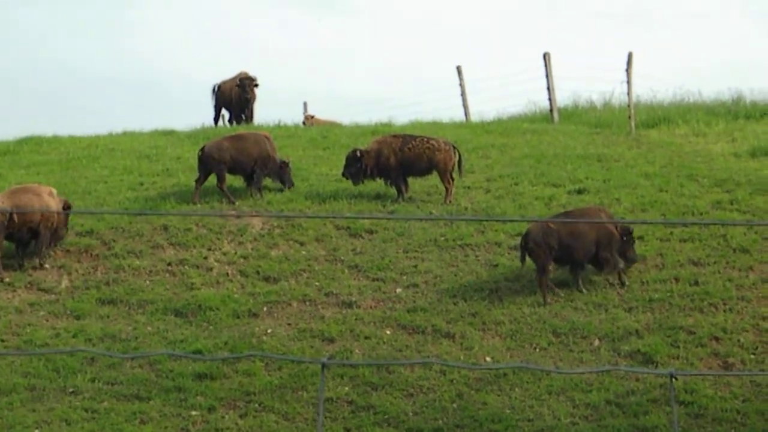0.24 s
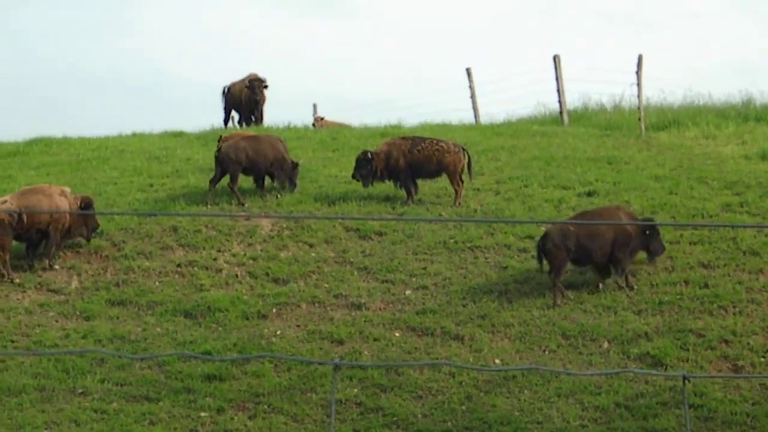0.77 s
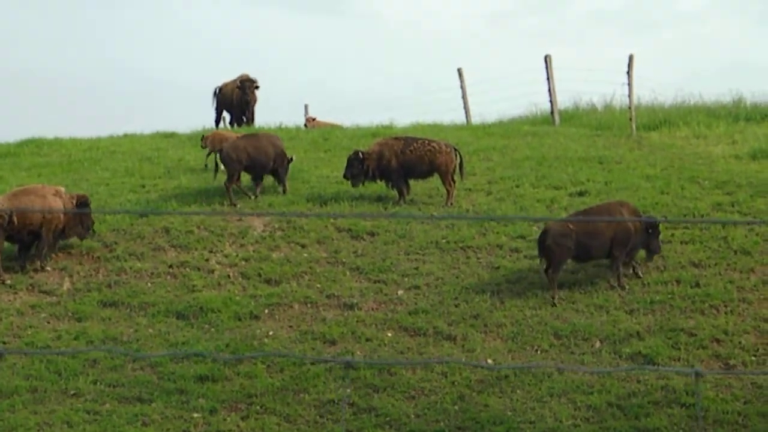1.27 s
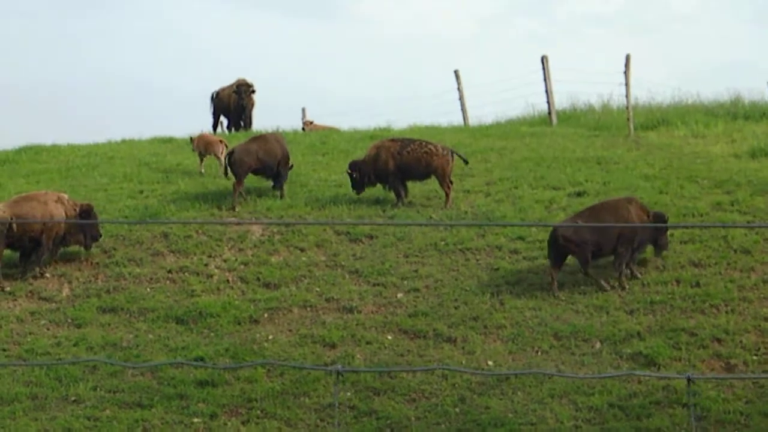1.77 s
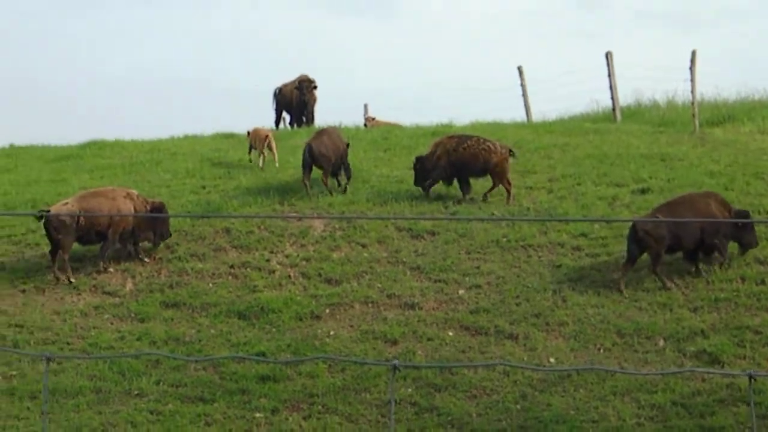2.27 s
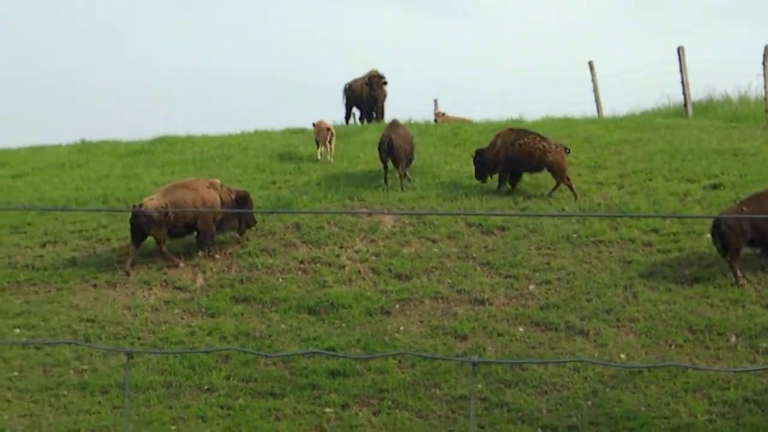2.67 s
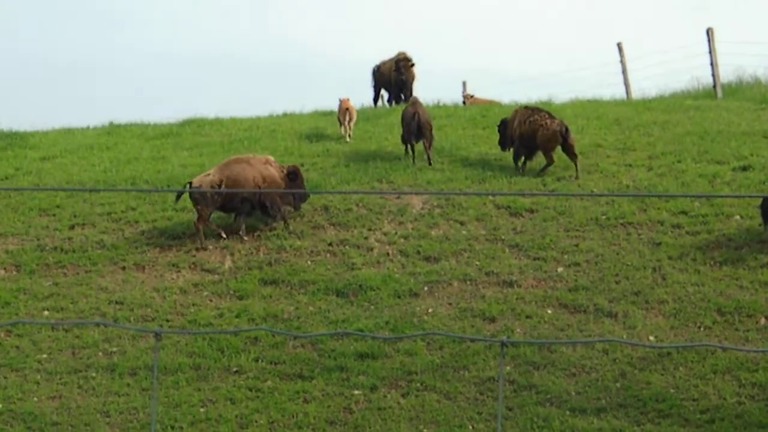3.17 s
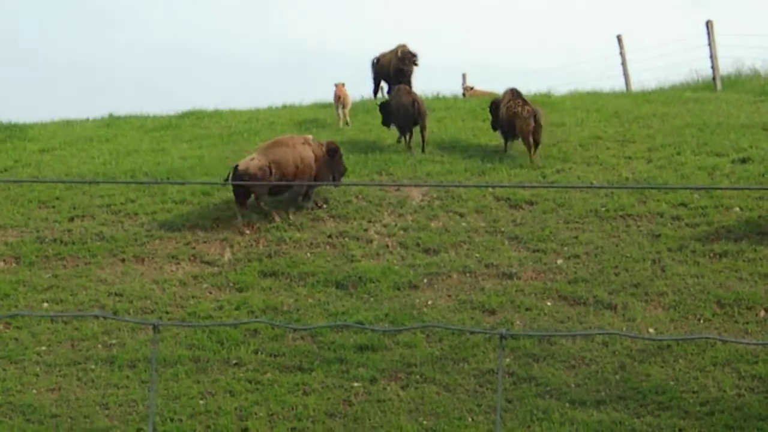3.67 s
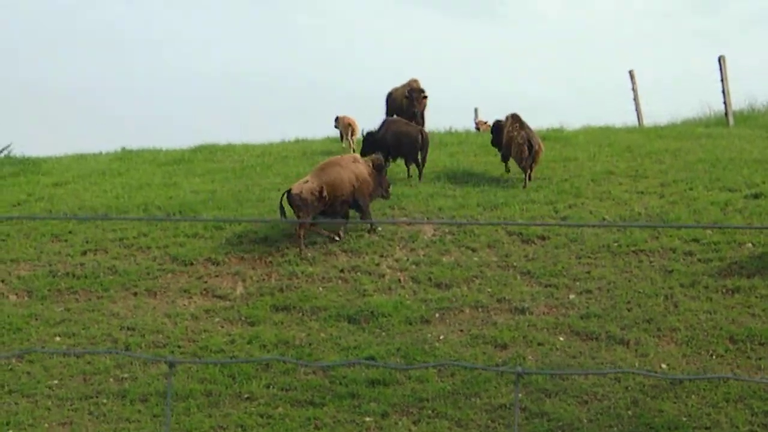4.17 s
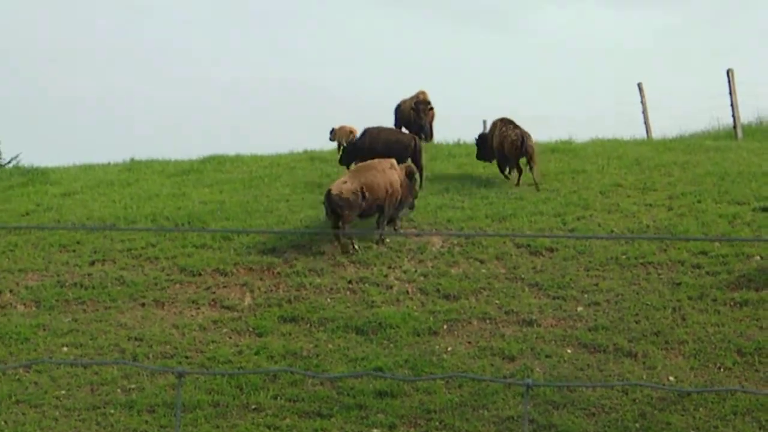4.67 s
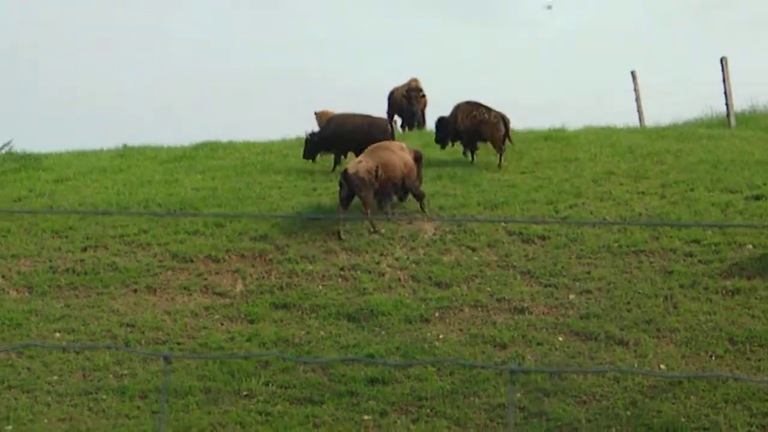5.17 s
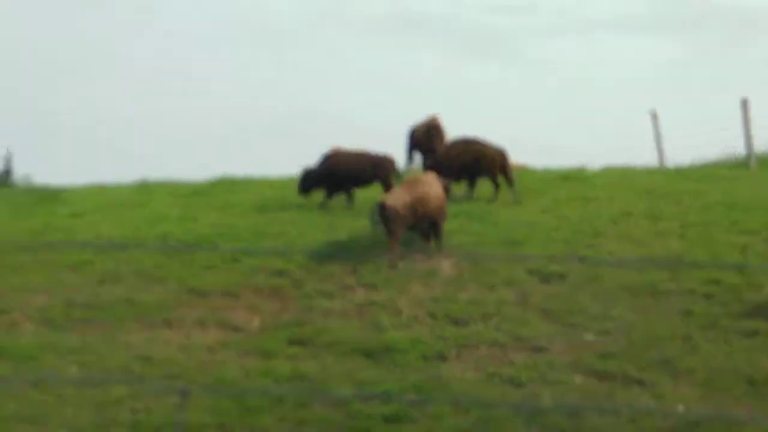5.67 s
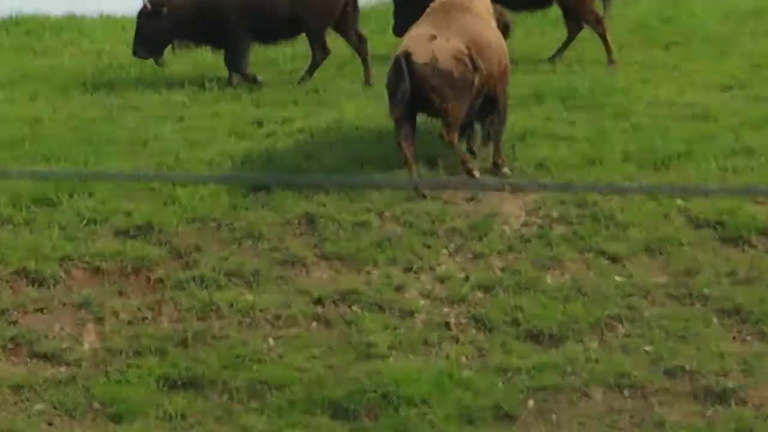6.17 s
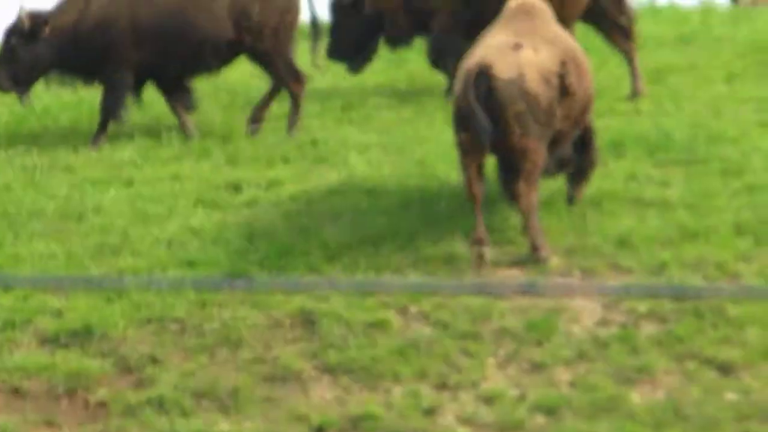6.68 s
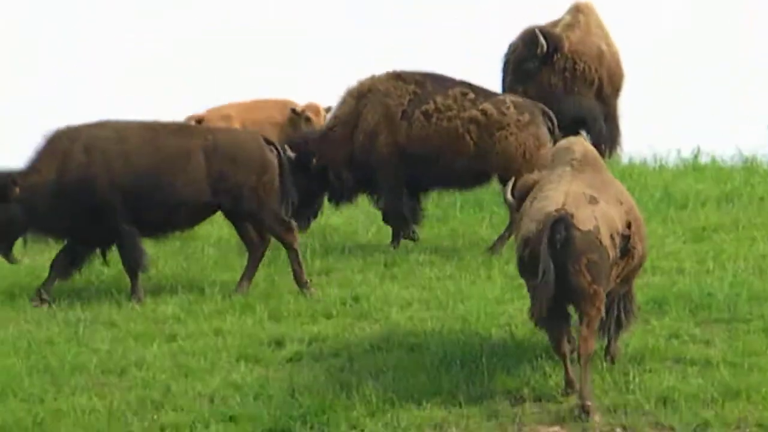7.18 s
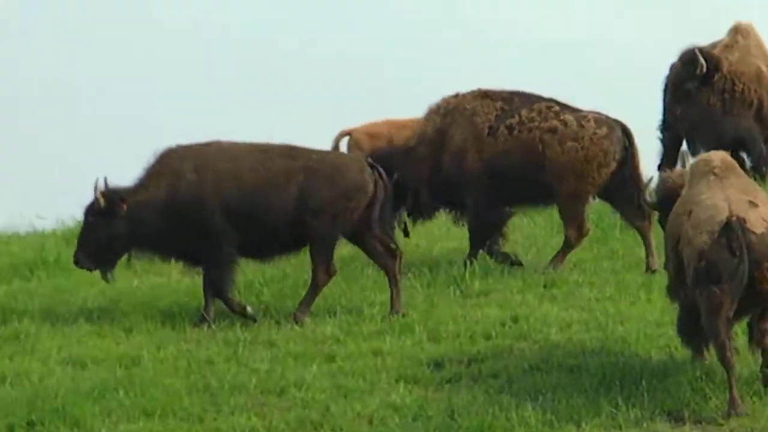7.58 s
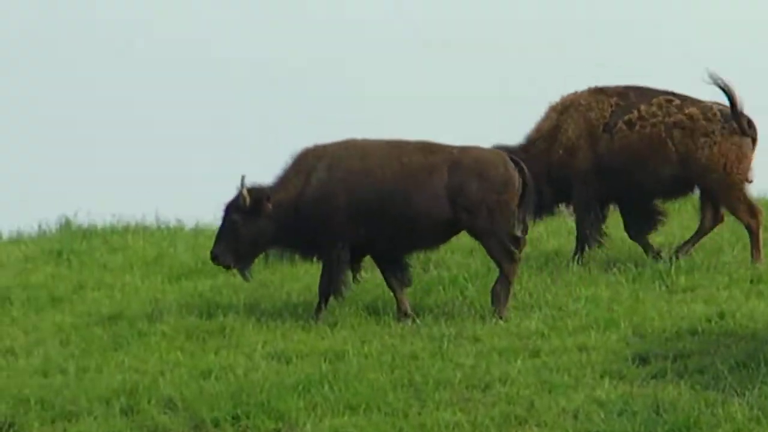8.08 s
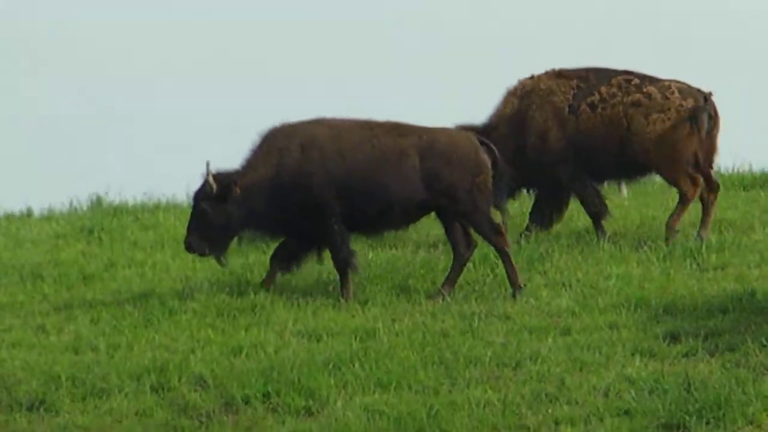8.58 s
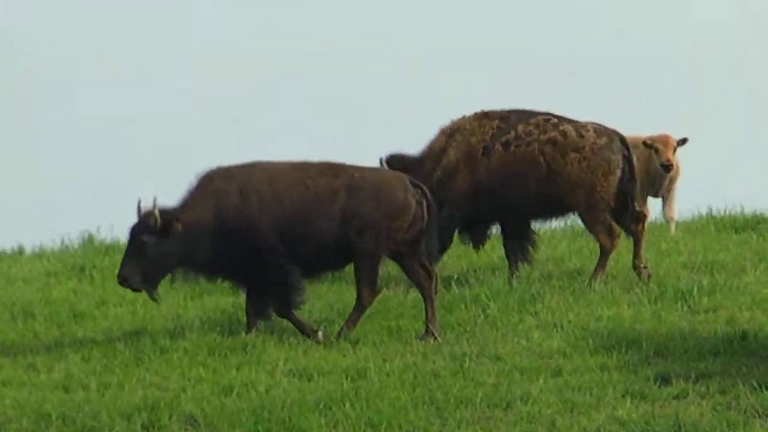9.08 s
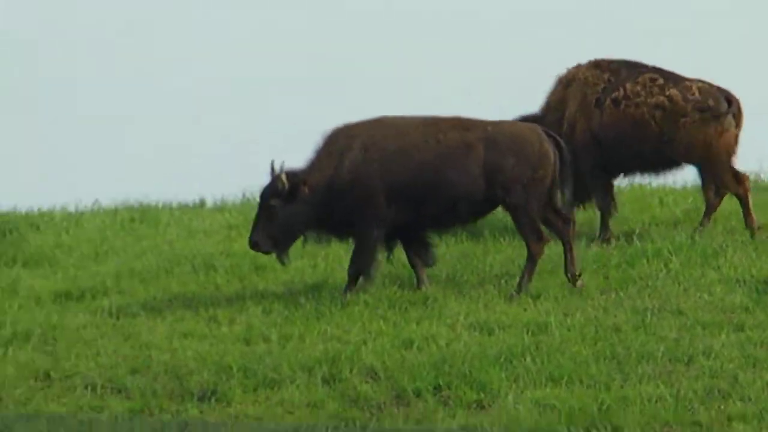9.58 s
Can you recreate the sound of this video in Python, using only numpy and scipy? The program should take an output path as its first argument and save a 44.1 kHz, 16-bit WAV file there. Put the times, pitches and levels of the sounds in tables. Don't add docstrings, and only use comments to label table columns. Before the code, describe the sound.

Bison give three low, rattling grunts on a grassy hillside amid crickets, bird trills and doves, while the handheld camera hums, knocks and clicks.

```python
import sys
import numpy as np
from scipy import signal
from scipy.io import wavfile

SR = 44100
rng = np.random.default_rng(int(sys.argv[2]) if len(sys.argv) > 2 else 0)


def generate_wav(signal):
    frames = np.transpose(np.atleast_2d(signal))
    scaled = np.clip(frames, -1, 1) * 32767
    pcm = np.round(scaled).astype(np.int16)
    wavfile.write(sys.argv[1], SR, pcm)


def linear_from_db(decibels):
    return 10 ** (np.asarray(decibels, float) / 20)


N = 433944


def rms_one(x):
    return x / np.sqrt(np.mean(x ** 2) + 1e-20)


def span(rows):
    s, *columns = np.transpose(rows)
    at = np.arange(round(s[0] * SR), min(N, round(s[-1] * SR) + 1))
    return at, [np.interp(at / SR, s, c) for c in columns]


def stretch(start, length):
    at = np.arange(round(start * SR), min(N, round((start + length) * SR)))
    return at, np.clip((at / SR - start) / length, 0, 1)


def faded(count, seconds):
    k = np.arange(count)
    return np.clip(np.minimum(k, count - k) / (seconds * SR), 0, 1)


def drift(rate_hz, size=N):
    r = np.exp(-2 * np.pi * rate_hz / SR)
    noise = rng.standard_normal(size + 9000)
    return rms_one(signal.lfilter([1], [1, -2 * r, r * r], noise)[9000:])


def band(x, low_hz, high_hz):
    return signal.sosfilt(signal.butter(2, [low_hz, high_hz], "band", fs=SR, output="sos"), x)


def ring(clicks, hz, t60):
    r, w = linear_from_db(-60 / (t60 * SR)), 2 * np.pi * hz / SR
    return signal.lfilter([0, np.sin(w)], [1, -2 * r * np.cos(w), r * r], clicks + 1e-18)


def add(out, start, hz, level):
    at = round(start * SR) + np.arange(len(hz))
    keep = at < N
    tone = level * np.sin(2 * np.pi * np.cumsum(hz) / SR)
    np.add.at(out, at[keep], tone[keep])


def hillside(x, echo_db, t60=0.32):
    t = np.arange(SR) / SR
    tail = rng.standard_normal(len(t)) * linear_from_db(-60 * t / t60) * (t > .008)
    return x + linear_from_db(echo_db) * signal.fftconvolve(x, tail / np.sqrt(np.sum(tail ** 2)))[:N]


# pitch_hz, level_db (per Hz)
HISS_COLOUR = [(25, -4.5), (50, -1.5), (77, 6), (150, -3), (300, -10.5), (500, -13.5), (1500, -15.5),
               (2500, -17.5), (4000, -17.5), (5600, -16), (7000, -9.5), (9000, -39)]
# middle_s, level_db, half_length_s
GUSTS = [
    (1.65, -58, 0.37),
    (2.704, -55, .25),
    (4.746, -40.5, 0.27),
    (6.189, -50, 0.57),
    (8.408, -54.5, .35),
    (9.5, -67, .6),
]


def air():
    hiss = np.zeros(N)
    edges_hz = 18 * 2 ** np.arange(0, 9.6, .5)
    white = rng.standard_normal((2, N))
    hz, db = np.transpose(HISS_COLOUR)
    for k, (low, high) in enumerate(zip(edges_hz, edges_hz[1:])):
        level_db = np.interp(np.log(low * high) / 2, np.log(hz), db)
        hiss += linear_from_db(level_db + .9 * drift(8)) * band(white[k % 2], low, high)
    t = np.arange(N) / SR
    wind = linear_from_db(-59.5)
    for s, db, half in GUSTS:
        wind = wind + linear_from_db(db) * np.exp(-2 * ((t - s) / half) ** 2)
    rumble = rms_one(band(rng.standard_normal(N), 31, 70))
    return linear_from_db(-49.5) * rms_one(hiss) + wind * linear_from_db(2 * drift(7.6)) * rumble


# time_s, level_db
CHORUS = [(0, -46.5), (1, -48.5), (8, -49), (8.6, -52), (9.84, -52.5)]


def far_crickets():
    far = np.zeros(N)
    u = np.arange(round(0.019 * SR)) / (0.02344 * SR)
    for hz, start, per_s in zip(np.linspace(4330, 4720, 9), rng.random(9), rng.uniform(3, 5, 9)):
        for s in np.arange(start / per_s, N / SR, 1 / per_s):
            loud = linear_from_db(4.5 * rng.standard_normal())
            for k in range(3):
                add(far, s + .033 * k, hz * (1.03 - 0.0697 * u), loud * np.sin(np.pi * u))
    blur = band(band(rng.standard_normal(N), 4567, 4940), 3986, 4300)
    skirt = band(rng.standard_normal(N), 4080, 4700)
    chorus = rms_one(rms_one(far) + 0.5 * rms_one(blur) + 0.49 * rms_one(skirt))
    out = np.zeros(N)
    at, (chorus_db,) = span(CHORUS)
    out[at] = linear_from_db(chorus_db + 2.5) * chorus[at]
    return out


# start_s, wing_strokes (count), peak_db, pitch_hz
NEAR_CHIRPS = [(0.03, 1, -35.5, 4270), (0.156, 1, -38.5, 4400), (.199, 3, -37.5, 4310),
               (0.3277, 1, -38, 4570), (0.398, 3, -35.5, 4450), (0.734, 2, -38.5, 4370),
               (1.2423, 4, -36, 4360), (1.5035, 1, -36, 4220), (1.563, 3, -39.5, 4400),
               (1.72, 2, -36, 4300), (1.984, 2, -35.5, 4270), (2.2034, 1, -38, 4300), (2.262, 1, -36, 4310),
               (3.385, 2, -34.5, 4220), (3.683, 1, -47, 4600), (4.6593, 1, -37, 4230),
               (4.782, 1, -38.5, 4280), (4.951, 1, -42, 4570), (5.513, 1, -35, 4260),
               (6.2926, 1, -35.5, 4560), (6.399, 2, -38, 4250), (6.4963, 1, -31, 4030),
               (6.557, 1, -36, 4320), (6.7345, 1, -33.5, 4300), (6.877, 2, -37.5, 4500),
               (6.985, 2, -34.5, 4320), (7.189, 1, -36.5, 4550), (7.276, 1, -33.5, 4280),
               (7.608, 1, -30, 4330), (7.8422, 1, -37, 4380)]


def near_cricket():
    out = np.zeros(N)
    u = np.arange(round(0.019 * SR)) / (0.02344 * SR)
    for s, strokes, db, hz in NEAR_CHIRPS:
        for k in range(round(strokes)):
            add(out, s - .002 + .034 * k, hz * (1.03 - .06 * u), linear_from_db(db) * np.sin(np.pi * u ** 0.55))
    return out


def hedge_birds():
    out = np.zeros(N)
    for start, gap, length, from_hz, to_hz, loud in rng.random((60, 6)):
        length_s = .012 + .025 * length
        u = np.arange(round(length_s * SR)) / (length_s * SR)
        glide = 3000 + 500 * from_hz + (400 + 700 * to_hz) * u
        level = linear_from_db(-61 + 6 * loud) * np.sin(np.pi * u)
        for k in range(2):
            add(out, start * N / SR + k * (.03 + .03 * gap), glide[::(-1) ** k], level)
    return out


# start_s, length_s, pitch_hz, level_db
HOOTS = [(0, 0.05, 477, -55), (.36, 0.17, 472, -58.5), (1.19, 0.1, 497, -54.5), (1.82, 0.071, 509, -56),
         (2.29, 0.073, 484, -55.5), (2.58, 0.097, 479, -57.5), (3.24, 0.065, 487, -62),
         (3.72, 0.084, 480, -55.5), (4.03, 0.087, 483, -58), (4.7, 0.07, 485, -55),
         (5.19, 0.073, 484, -54.5)]
# start_s, length_s, pitch_hz, level_db
SIGHS = [(.301, 0.31, 608, -64.5), (1.322, 0.14, 640, -64), (1.78, 0.47, 616, -68),
         (2.668, 0.39, 553, -63.5), (2.95, 0.29, 641, -66.5), (3.396, 0.45, 612, -63),
         (4.1, .35, 548, -65.5), (5.49, 0.31, 490, -50), (5.782, 0.13, 574, -52.5)]


def doves():
    out = np.zeros(N)
    for rows, glide, drop in ((HOOTS, .13, -0.051), (SIGHS, -.08, -0.28)):
        for s, length, hz, db in rows:
            u = stretch(0, length)[1]
            arch = 1 + glide * (u - .5) + drop * u ** 6
            add(out, s, hz * arch, linear_from_db(db + 3.5) * np.sqrt(np.sin(np.pi * u)))
    return out


# start_s, from_hz, to_hz, level_db
TWITTERS = [(.16, 2960, 4000, -66), (.351, 3680, 4370, -52.5), (0.381, 3300, 4300, -57.5),
            (.412, 3750, 3060, -64), (.428, 5700, 5530, -64), (0.467, 4610, 3550, -56),
            (.5, 3400, 3160, -66), (.675, 2950, 3620, -68), (1.03, 4420, 3600, -56.5),
            (1.074, 2960, 3570, -64), (1.8, 3300, 4100, -62), (1.834, 3570, 3080, -63),
            (2.015, 4150, 3680, -59), (2.045, 3440, 3300, -61), (2.912, 3420, 3710, -62),
            (4.965, 3760, 3250, -60), (5.913, 5500, 5800, -63), (7.282, 3850, 3320, -66),
            (7.884, 2980, 3700, -66), (7.912, 3670, 2870, -69), (8.133, 3940, 3500, -60.5),
            (8.163, 3000, 3800, -63.5), (8.198, 3750, 2950, -71), (8.912, 2910, 3760, -65),
            (8.945, 3680, 2750, -74), (9.066, 4000, 3440, -64), (9.26, 5950, 5700, -61),
            (9.68, 3060, 3770, -68), (.095, 5000, 5350, -66), (.115, 5350, 5000, -68),
            (.19, 3600, 2880, -70), (.575, 5950, 5600, -67), (.64, 3700, 3400, -66),
            (.695, 3500, 2800, -69), (.84, 3100, 2700, -69), (.94, 2800, 3600, -68),
            (.965, 3300, 2680, -68), (6.805, 3000, 3620, -66.5), (7.05, 5500, 5670, -67),
            (7.17, 3500, 3380, -67), (7.24, 5950, 5680, -67), (7.26, 3900, 3580, -61),
            (7.286, 2900, 3460, -67), (7.316, 3300, 2780, -68), (7.855, 5800, 5500, -68),
            (9.1, 3700, 3400, -65)]


def twitters():
    out = np.zeros(N)
    u = stretch(0, .026)[1]
    for s, from_hz, to_hz, db in TWITTERS:
        add(out, s, from_hz + (to_hz - from_hz) * u, linear_from_db(db + 17.5) * np.sin(np.pi * u))
    return out


# start_s, length_s, top_hz, peak_db
WAILS = [
    (9.03, .57, 681.3, -47),
    (9.755, 0.7, 688, -47),
]
# pitch_hz, level_db
BEAK = [(600, -7.5), (1200, 6), (1400, -22), (1750, 5), (2050, 0), (2700, -3), (3080, 4.5), (3400, 2),
        (4000, -4.5), (4700, -33), (5500, -2), (6100, -17), (7400, -8), (8400, -43)]


def wails():
    out = np.zeros(N)
    for start, length, top_hz, peak_db in WAILS:
        at, u = stretch(start, length)
        slack = ((u - .5) / .5) ** 2
        hz = top_hz * (1 - .17 * slack + 0.0033 * drift(27, size=len(at)))
        level_db = peak_db - 15.5 * slack
        edges = np.clip(np.minimum(u, 1 - u) * length / 0.044, 0, 1)
        for order in range(1, 13):
            mouth_db = np.interp(order * hz, *np.transpose(BEAK))
            flutter_db = 4 * drift(9, size=len(at))
            add(out, start, order * hz, linear_from_db(level_db + mouth_db + flutter_db) * edges)
    return out


# start_s, length_s, peak_db, upper_pitch_hz, rise_hz
TRILLS = [(1.114, 0.16, -41, 3564, 248), (2.552, 0.16, -35, 3710, 50), (3.617, 0.19, -29.5, 3536, 341),
          (4.515, 0.23, -33, 3496, 430), (5.44, 0.22, -30.5, 3460, 515), (6.376, 0.228, -27, 3530, 398),
          (7.522, 0.21, -28, 3540, 326)]
# sweep_depth (share), octave_db, place_in_first_sweep (0-1)
MANNERS = [(0.33, -2, 0.4), (0.38, 2.5, 0.2), (0.27, 2, .92), (0.25, 2.5, .95), (.23, 2, .51),
           (0.25, -3.5, .84), (0.25, -1.5, .53)]


def trills():
    out = np.zeros(N)
    for (start, length, peak_db, start_hz, rise_hz), (deep, octave_db, place) in zip(TRILLS, MANNERS):
        at, along = stretch(start, length)
        t, size = along * length, len(at)
        top_hz = start_hz + rise_hz * along ** 1.3
        swell_s = 0.1
        level_db = peak_db - 22.5 * np.maximum(0, 1 - t / swell_s) ** 2 - 50.5 * np.maximum(0, t - swell_s)
        sweep_s = .01156 + .065 * t
        u = (np.cumsum(1 / sweep_s) / SR + place) % 1
        fall = np.clip(1 - u / 0.0758, 0, 1) + np.clip((u - .25) / 0.69, 0, 1) ** 1.3
        depth = deep * np.minimum(1, .02 + 2.4 * along)
        hz = top_hz * (1.03 - depth * fall)
        phase = 2 * np.pi * np.cumsum(hz) / SR
        uneven = linear_from_db((-7.5 - .3 * peak_db) * drift(90, size=size))
        throb = .25 + np.sin(np.pi * u ** .5) ** 2
        tone = linear_from_db(-14 * fall) * throb * np.sin(phase)
        through_beak = np.exp(-((2 * hz - 6950) / 750) ** 2)
        octave_level_db = octave_db + 4.2 * drift(150, size=size) - 25 + 10 * np.minimum(1, 1.34 * along)
        octave = through_beak * linear_from_db(octave_level_db) * np.sin(2 * phase)
        out[at] += linear_from_db(level_db) * faded(size, 0.0058) * rms_one(uneven * (tone + octave))
    return out


# start_s, peak_db, settling_wait_s
SEEKS = [(0.168, -22, 0.047), (0.361, -23.5, 0.057), (.57, -22, 0.044), (1.297, -21.5, 0.067),
         (1.499, -21.5, 0.063), (1.669, -22.5, 0.057), (2.374, -22, 0.066), (2.58, -24, 0.05),
         (2.774, -22.5, 0.044), (3.515, -21, 0.037), (3.709, -23, 0.059), (3.918, -23, 0.038),
         (4.507, -24, 0.062), (4.617, -23.5, 0.042), (4.785, -22.5, 0.043), (4.917, -23, 0.087),
         (5.211, -24.5, 0.049), (5.575, -26.5, 0.066), (6.669, -22.5, 0.075), (6.974, -25, 0.046),
         (7.077, -25.5, 0.069), (7.977, -25.5, 0.059), (8.085, -24, 0.053), (8.186, -25, 0.058),
         (9.303, -23, 0.05)]
# first_s, last_s, hops (count)
HOPS = [(.05, .08, 2), (.284, .324, 2), (.45, .45, 1), (1.215, 1.215, 1), (1.421, 1.448, 2),
        (2.263, 2.304, 2), (2.496, 2.534, 2), (2.659, 2.698, 2), (3.402, 3.43, 2), (3.601, 3.66, 2),
        (3.802, 3.83, 2), (4.698, 4.698, 1), (5.031, 5.06, 2), (5.105, 5.161, 2), (6.834, 6.935, 4),
        (7.194, 7.279, 3), (7.867, 7.941, 3), (9.374, 9.374, 1), (9.498, 9.545, 2)]


def knocks():
    rows = [(s, db) for s, db, wait in SEEKS]
    rows += [(s + wait, db - 8.5) for s, db, wait in SEEKS]
    for first, last, hops in HOPS:
        rows += [(s, -32.5) for s in np.linspace(first, last, hops)]
    return np.transpose(rows)


# pitch_hz, level_db, t60_s
CASE = [(149.3, -17.5, 0.12), (261.6, -4, 0.044), (301.7, -5.5, 0.05), (750, -33.5, .06),
        (1028, -23.5, 0.032), (1573, -24, 0.025)]


def head_seeks():
    s, peak_db = knocks()
    chance = rng.standard_normal((len(s), len(CASE)))
    rebound_s, rebound_db = .015, -7.5
    out = np.zeros(N)
    for (hz, db, t60), own in zip(CASE, chance.T):
        clicks = np.zeros(N)
        clicks[(s * SR).astype(int)] = linear_from_db(peak_db + db + 2.5 + 2.34 * own)
        clicks[((s + rebound_s) * SR).astype(int)] += linear_from_db(peak_db + db + 0.5 + rebound_db - 1.2 * own)
        half_width = max(45, hz / 6)
        out += band(ring(clicks, hz, t60), hz - half_width, hz + half_width)
    return out


# time_s, level_db
SPIN = [(0.0, -49), (1.45, -43.5), (1.59, -49), (6.36, -53.5), (6.49, -51.5), (9.84, -38.5)]


def disk_hum():
    turns = np.cumsum(70.8 * (1 + .035 * drift(3))) / SR
    hum = linear_from_db(-2) * np.sin(2 * np.pi * turns) + linear_from_db(-20) * np.sin(4 * np.pi * turns)
    out = np.zeros(N)
    at, (spin_db,) = span(SPIN)
    out[at] = np.sqrt(2) * linear_from_db(spin_db + 2.2 * drift(5)[at]) * hum[at]
    return out


# start_s, peak_db, ring_hz, thump_db, crack_db
CLICKS = [(1.46, -39, 2000, -18, 0), (1.475, -39.5, 2000, -20, -8), (1.49, -23.5, 740, -20, -24),
          (1.5, -44.5, 1500, -20, 14), (1.565, -33, 970, -18, 4), (1.573, -39, 1200, -18, 5),
          (1.581, -31.5, 1490, -32, 8), (1.595, -29, 2050, -5, -5), (1.608, -29, 1400, -5, -2),
          (4.786, -22.5, 600, -10, -12), (4.787, -22.5, 2220, -23, -18), (4.958, -36.5, 805, -1, -26),
          (4.969, -44, 2980, -5, 14), (5.037, -26, 1800, -22, -20), (5.352, -14, 1820, -1, -1),
          (5.353, -25, 2850, -21, -10), (5.358, -30, 547, -14, -30), (5.647, -36.5, 504, 16.5, 5),
          (6.145, -26, 730, 15, -23), (6.208, -20, 2270, -12.5, -14), (6.214, -30, 910, -10, 5),
          (6.222, -23.5, 2300, -14, -9.5), (6.237, -21.5, 1440, -16, -12), (6.245, -27.5, 1550, 6.5, -12),
          (6.253, -29, 1300, -12, -6), (6.335, -31, 881, 7, 0), (6.341, -40, 2000, -10, 1)]
# start_s, level_db, pitch_hz
THUDS = [
    (6.214, -16, 95),
    (5.13, -30, 75),
]


def fingers():
    out, t = np.zeros(N + 4000), np.arange(4000) / SR
    for s, db, hz, thump_db, crack_db in CLICKS:
        grit = rng.standard_normal((2, 4000))
        grit[:, 0] = 8
        body = band(grit[0] * linear_from_db(-60 * t / 0.028), hz / 1.9, hz * 1.6)
        crack = band(grit[1] * linear_from_db(-60 * t / 0.013), 2400, 8200)
        thump = np.sin(2 * np.pi * 135 * (t - .002)) * np.minimum(1, t / 0.0013) * linear_from_db(-60 * t / 0.058)
        click = body / abs(body).max() + linear_from_db(crack_db) * crack / abs(crack).max() - linear_from_db(thump_db) * thump
        out[round(s * SR):][:4000] += linear_from_db(db) * click
    for s, db, hz in THUDS:
        thud = np.minimum(1, t / 0.0028) * np.sin(2 * np.pi * hz * t)
        out[round(s * SR):][:4000] += linear_from_db(db - 60 * t / 0.11) * thud
    return out[:N]


def pulse_train(per_s, jitter, uneven_db):
    turns = np.cumsum(per_s * (1 + jitter * drift(31.1, size=len(per_s)))) / SR
    strength = linear_from_db(uneven_db * rng.standard_normal(200))[turns.astype(int)]
    return np.diff(np.floor(turns), prepend=0) * strength, turns % 1, strength


def resonance(x, hz, width):
    r = np.exp(-np.pi * width / SR)
    a = [1, -2 * r * np.cos(2 * np.pi * hz / SR), r * r]
    once = signal.lfilter([1, 0, -1], a, x + 1e-18)
    return signal.lfilter([1, 0, -1], a, once)


# start_s, length_s, peak_db, attack_s, sag_db_per_s
GRUNTS = [
    (0.729, 0.48, -32.5, 0.13, 20),
    (5.629, 0.75, -31.5, 0.15, 3.5),
    (8.239, 0.475, -35, 0.2, 6),
]
# slaps_per_s, buzz_hz
PACES = [(31.83, 103), (29.23, 139), (32.4, 109)]
VOICES = [
    (1, .3, .45, .15, .45),
    (.03, .9, .65, .8, 1.1),
    (.35, .5, .6, .9, .6),
]
# pitch_hz, width_hz, level_db
THROATS = [
    [(54, 40, -2.5), (106.7, 50, 0.5), (224, 176, -6.5), (389, 144, -8), (600, 98, -24), (1186, 190, -21),
     (1380, 150, -21.5), (1590, 230, -23.5), (1860, 170, -24.5), (2160, 7600, -18)],
    [(60, 58, -5.5), (140, 100, -7), (225, 62, -7.5), (287.7, 71, -3.5), (580, 240, -19.5), (790, 190, -18),
     (1300, 660, -23.5), (2520, 3400, -23.5), (7350, 1200, -24)],
    [(55, 45, 1.5), (103, 76, 0), (202, 126, -3), (342, 70, -4), (530, 91, -23), (670, 150, -24),
     (1290, 1200, -17.5)],
]
# time_s, level_db
EFFORTS = [
    [(.73, 1), (.79, -2), (.828, 2), (.858, -5), (.89, 1.5), (.95, 0.5), (1.03, -0.5), (1.065, 3.5),
     (1.1, -4.5)],
    [(5.63, -0.5), (5.72, -3), (5.79, 1), (5.875, 2), (5.97, -1.5), (6.05, -0.5), (6.12, 1.5), (6.2, -0.5),
     (6.33, 0.5)],
    [(8.24, 0), (8.35, 0), (8.45, 0), (8.55, -0.5), (8.65, -0.5)],
]
# from_s, to_s, pace (share)
DRAGS = [(.951, .996, .59), (5.815, 5.93, .62), (5.93, 6.015, .72)]


def grunts():
    out = np.zeros(N)
    for grunt, pace, throat, voice, effort in zip(GRUNTS, PACES, THROATS, VOICES, EFFORTS):
        start, length, peak_db, attack, sag = grunt
        per_s, buzz_hz = pace
        slap, buzz, breath, leak, rise = voice
        at, u = stretch(start, length)
        t, size = u * length, len(at)
        level_db = peak_db - 15 * np.clip(1 - t / attack, 0, 1) - sag * np.maximum(0, t - attack)
        level_db -= 21 * np.clip(1 - (length - t) / 0.041, 0, 1) ** 2
        level_db += np.interp(at / SR, *np.transpose(effort))
        drag = np.ones(size)
        for a, b, share in DRAGS:
            drag *= np.where((at > a * SR) & (at < b * SR), share, 1)
        slaps, place, strength = pulse_train(per_s * drag, .025, 1.0)
        opening = strength * (.12 + np.sin(np.pi * place ** .6) ** 3)
        buzz_pace = buzz_hz * (1 + .008 * (level_db - peak_db) + .06 * drift(5, size=size))
        buzzing = pulse_train(buzz_pace, .07, 3)[0]
        folds = slap * rms_one(slaps) + buzz * rms_one(buzzing * opening)
        puff = breath * rms_one(rng.standard_normal(size) * (leak + opening))
        call = np.zeros(size)
        for k, (hz, width, db) in enumerate(throat):
            source = folds + puff * (hz / 300) ** rise
            call += (-1) ** k * linear_from_db(db) * rms_one(resonance(source, hz, width))
        out[at] += linear_from_db(level_db) * rms_one(call)
    return out


def scene():
    background = air() + far_crickets() + near_cricket()
    birds = hillside(hedge_birds(), echo_db=-5) + hillside(doves() + twitters(), echo_db=-6)
    call = wails()
    birds += hillside(call, echo_db=-9, t60=.8)
    birds += hillside(linear_from_db(-30) * band(call, 1950, 2150), echo_db=25, t60=1.6)
    birds += hillside(hillside(trills(), echo_db=-11, t60=.06), echo_db=-12, t60=.6)
    camera = head_seeks() + disk_hum() + fingers()
    herd = hillside(grunts(), echo_db=-10)
    return (background + birds + camera + herd)[None]


def roll_off(x):
    return signal.sosfilt(signal.butter(12, 9000, fs=SR, output="sos"), x)


def record(dry):
    cut = signal.sosfilt(signal.butter(6, 8300, fs=SR, output="sos"), dry)
    cut = signal.sosfilt(signal.cheby2(14, 50, 9250, fs=SR, output="sos"), cut)
    mix = cut - .0027
    return roll_off(mix)


dry = scene()
out = record(dry)
generate_wav(out)
```